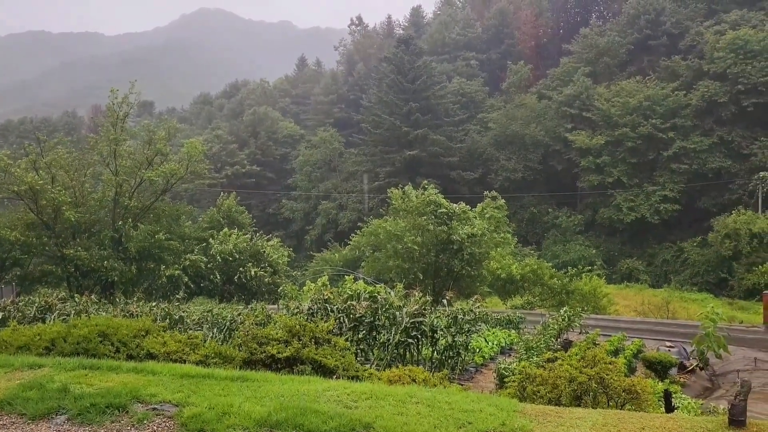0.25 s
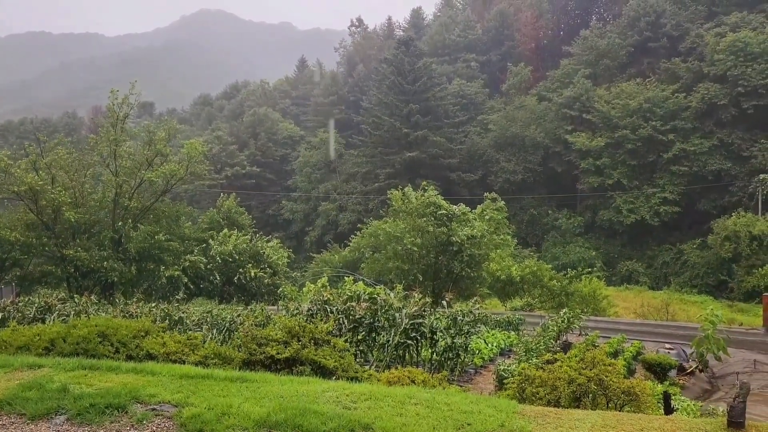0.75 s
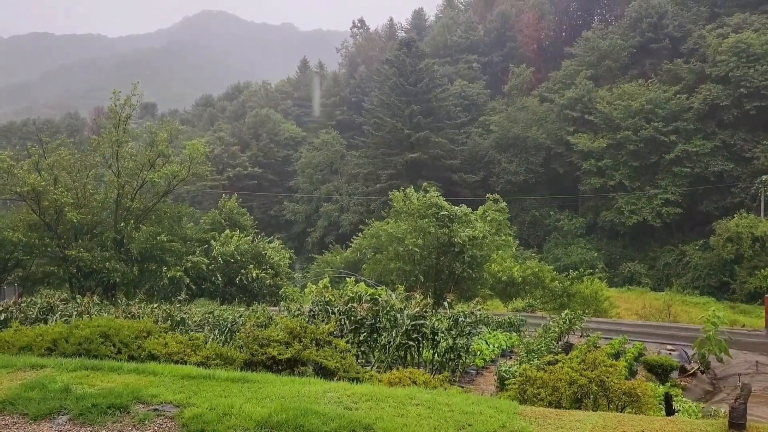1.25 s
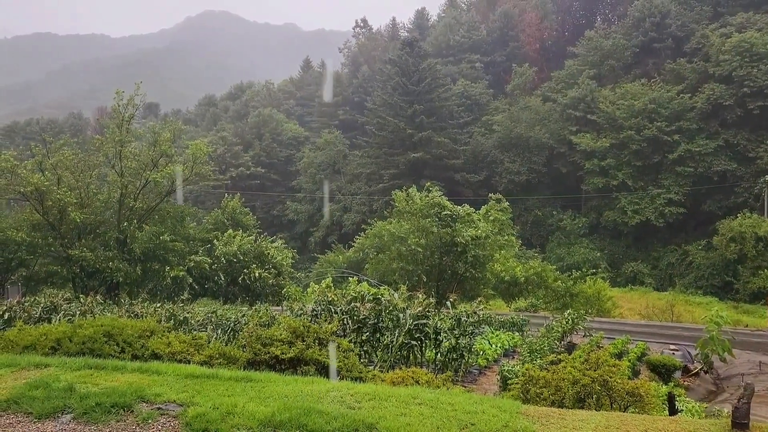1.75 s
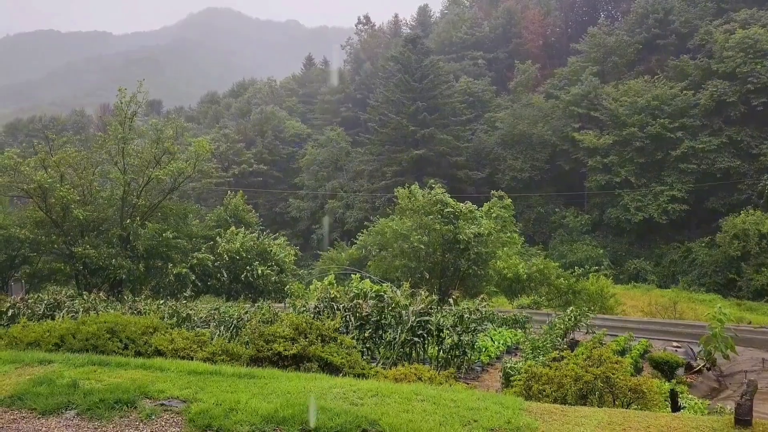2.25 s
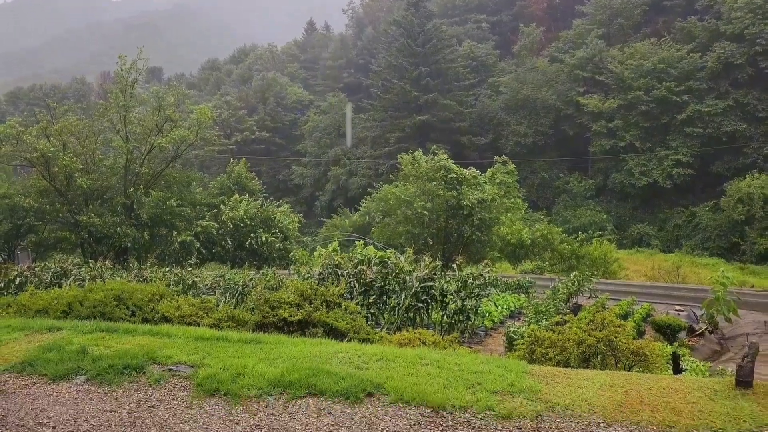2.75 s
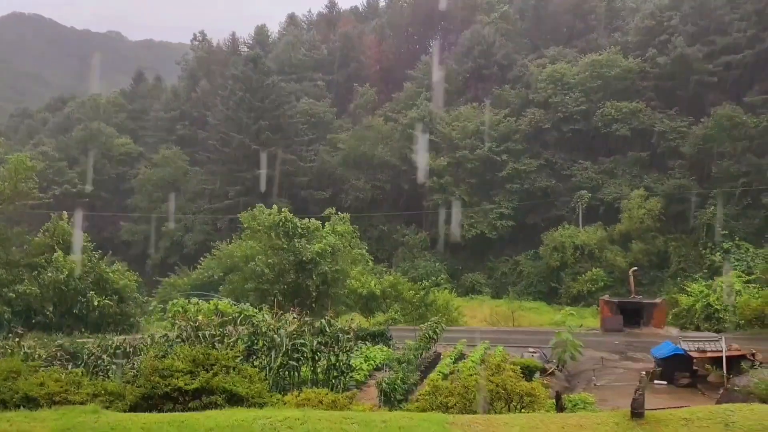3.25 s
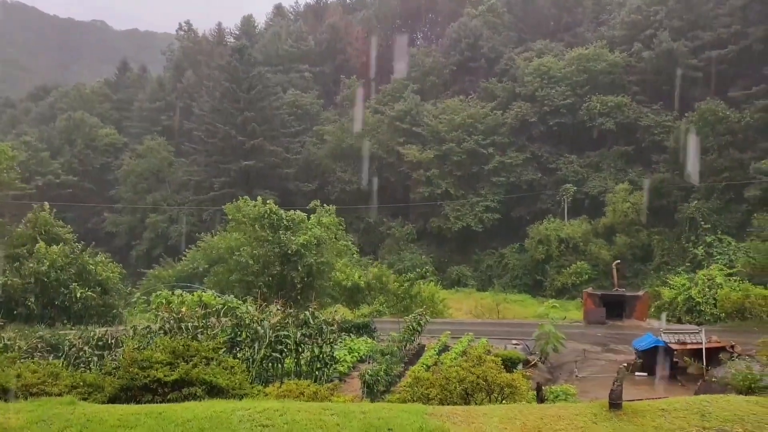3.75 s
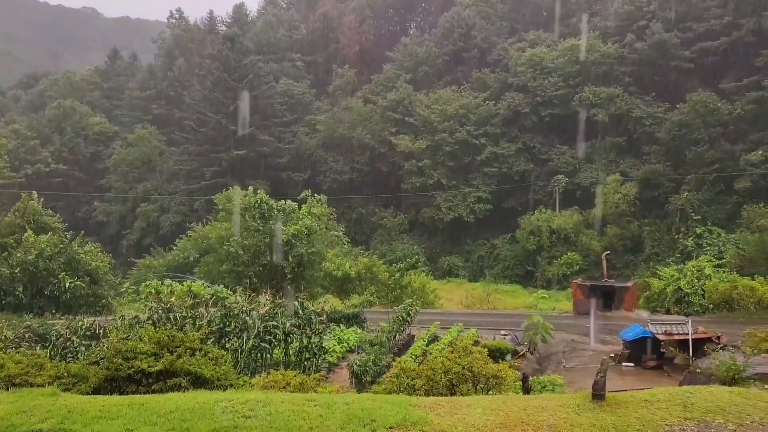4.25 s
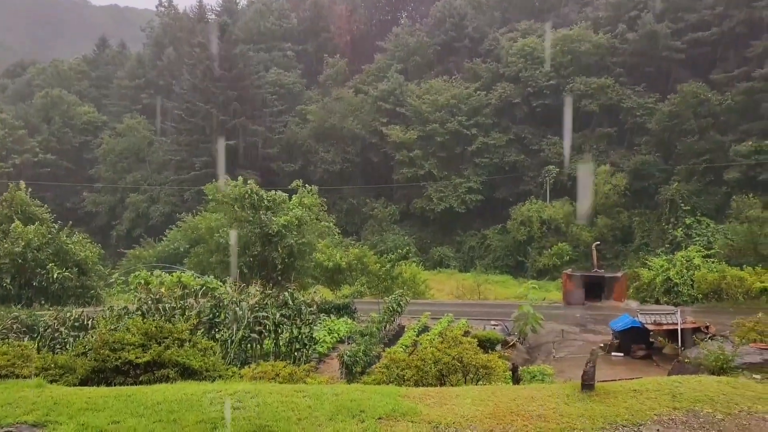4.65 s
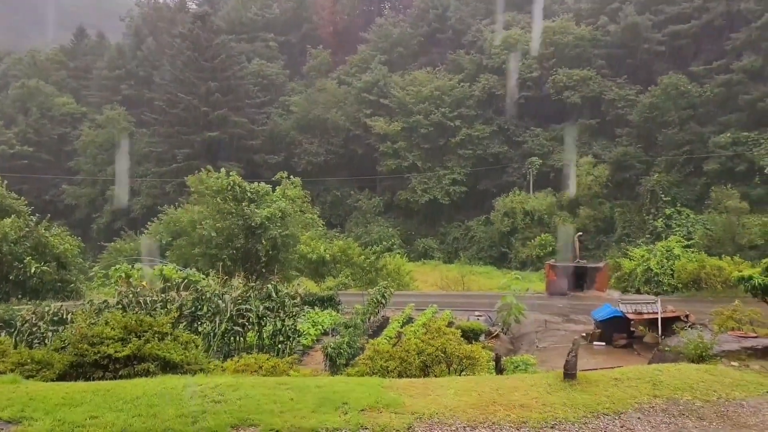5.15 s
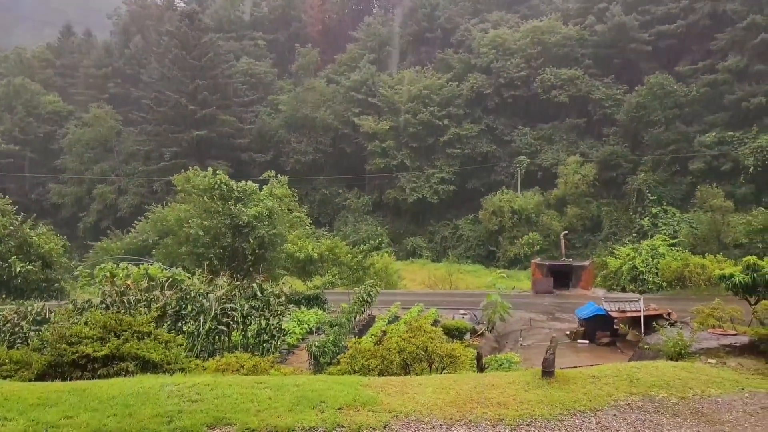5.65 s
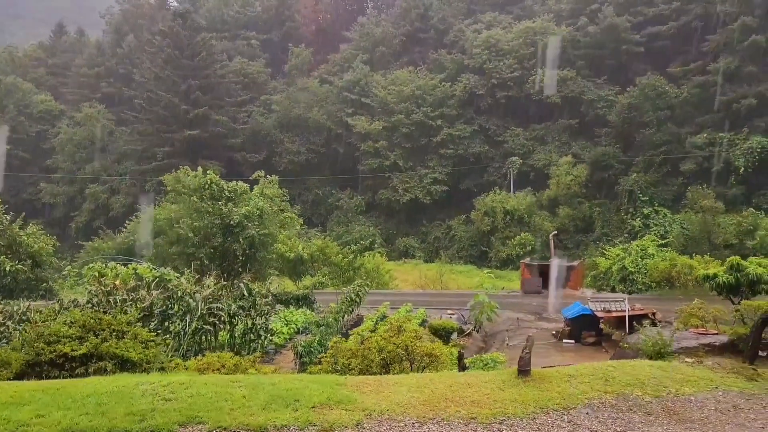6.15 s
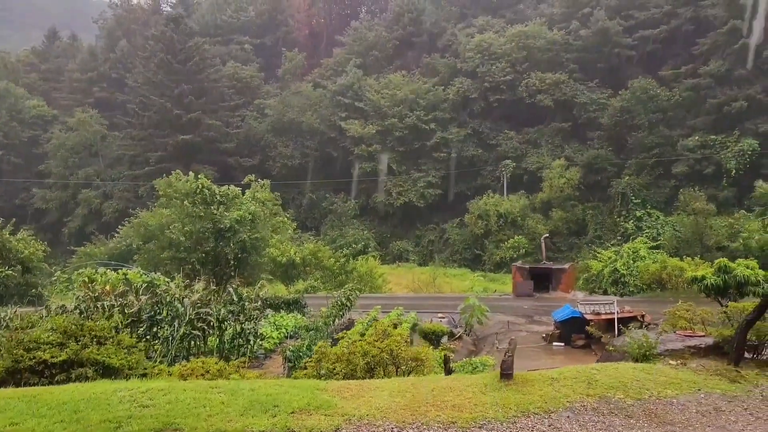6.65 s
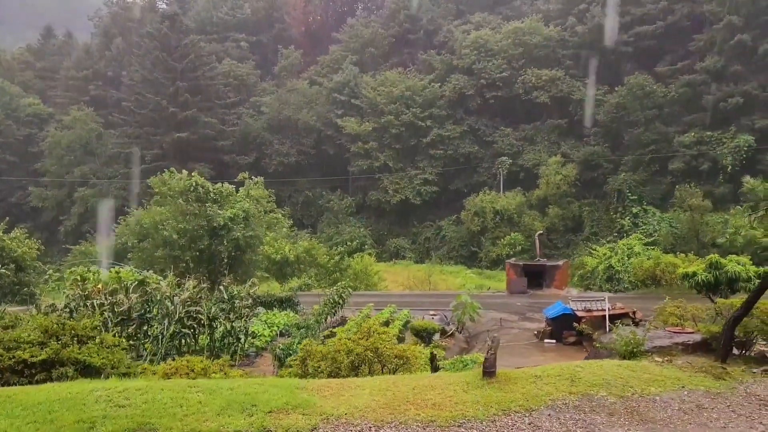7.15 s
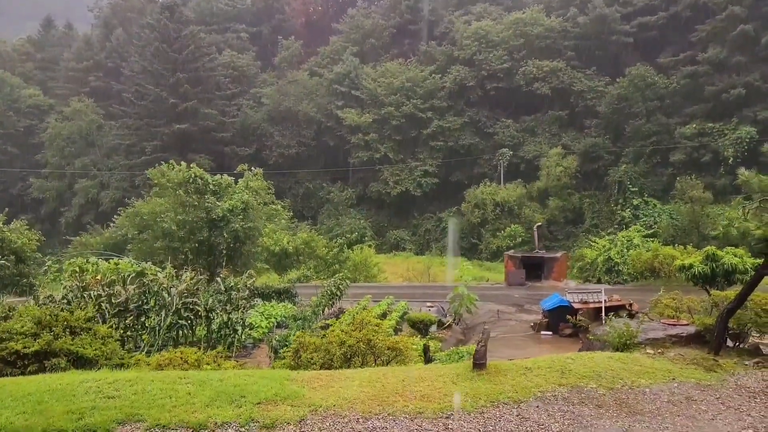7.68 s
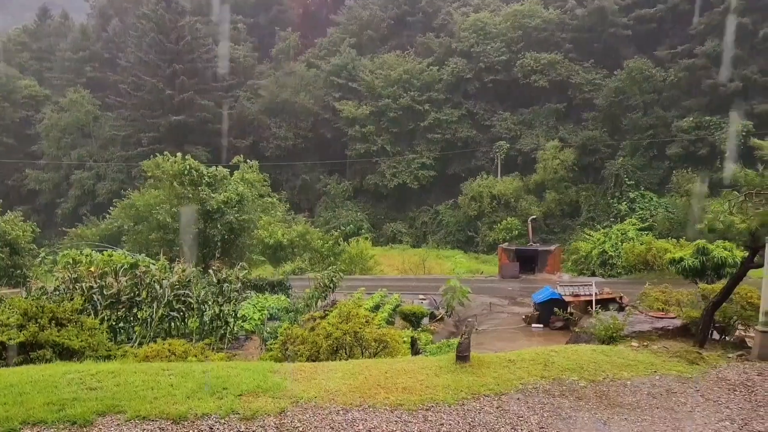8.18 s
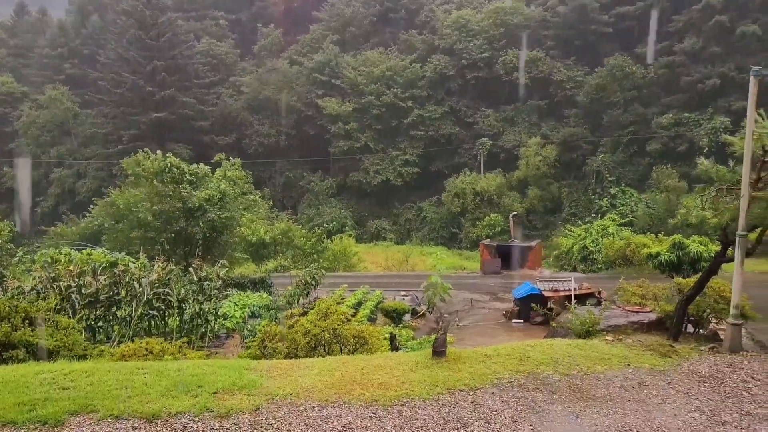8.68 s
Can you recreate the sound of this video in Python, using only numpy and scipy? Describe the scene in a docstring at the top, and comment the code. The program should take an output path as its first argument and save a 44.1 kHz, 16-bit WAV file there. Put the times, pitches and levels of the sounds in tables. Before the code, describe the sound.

Crisp spattering rain and clicking roof drips outside a house, briefly cut out at three seconds, returning as a louder steady downpour.

```python
"""Rain on trees, grass and a gravel yard, heard from under the eaves of a house by two spaced microphones. Near
drops are random clicks of uneven size, each ringing briefly at one of many pitches; eave drips crack, tick,
plop and spray on wet gravel. Far rain is a smooth hiss of noise bands; a low rumble of filtered noise swells at
times. After three seconds the sound drops out for an instant and the scene changes to heavier, fuller rain."""
import sys
import numpy as np
from scipy import signal
from scipy.io import wavfile
from scipy.ndimage import uniform_filter1d

SR = 44100
rng = np.random.default_rng(int(sys.argv[2]) if len(sys.argv) > 2 else 0)


def digitize_waveform(pressure):
    """Quantize a signal to 16-bit integers and store it at the path in sys.argv[1].

    Rows of a 2-D input are taken as channels; values are limited to [-1, 1].
    """
    field = np.atleast_2d(pressure).T
    bounded = np.clip(field, -1, 1)
    quanta = np.round(bounded * 32767).astype(np.int16)
    wavfile.write(sys.argv[1], SR, quanta)


N = 393372

# Pairs of settings: light rain, then heavy rain. Left-right differences: + is left.
DROPOUT_S = (2.9885, 3.0215)   # silent from, to
SPACING_M, SOUND_M_S = 0.17, 343   # microphone spacing, speed of sound


def from_db(db):
    """Gain of a level in dB."""
    return 10 ** (np.asarray(db) / 20)


def rms_one(x):
    """Scaled to rms 1."""
    return x / np.sqrt(np.mean(x ** 2) + 1e-20)


def peak_one(x):
    """Scaled to peak 1."""
    return x / np.abs(x).max()


def at_hz(points, hz):
    """Spectrum read on a log-frequency axis."""
    points_hz, points_db = np.array(points).T
    return np.interp(np.log(hz), np.log(points_hz), points_db)


def drift(rate_hz):
    """Slow random signal of rms 1: noise through a double one-pole low-pass, computed at SR / 40."""
    r = np.exp(-80 * np.pi * rate_hz / SR)
    white = rng.standard_normal(N // 40 + 2002)
    slow = signal.lfilter([1], [1, -2 * r, r * r], white)[2000:]   # run-in dropped
    return np.interp(np.arange(N) / 40, np.arange(len(slow)), rms_one(slow))


def resonance(hz, width_hz):
    """Two-pole band-pass coefficients, gain about 1 at the peak."""
    r = np.exp(-np.pi * width_hz / SR)
    b = (1 - r * r) / 2 * np.array([1, 0, -1])
    a = [1, -2 * r * np.cos(2 * np.pi * hz / SR), r * r]
    return b, a


def heavy():
    """0 in the light rain, 1 in the heavy rain; switches inside the dropout."""
    return (np.arange(N) / SR > np.mean(DROPOUT_S)) * 1.


def by_rain(pair):
    """One value in the light rain, another in the heavy rain."""
    return np.interp(heavy(), [0, 1], pair)


# steady near spatter, light then heavy rain: (time [s], level [dB])
SPATTER_LEVEL = [
    [(0.0, -33), (0.36, -34), (0.68, -30.5), (0.86, -33.5), (1.23, -43), (1.53, -33.5), (2.13, -40),
     (2.98, -37)],
    [(3.03, -29.5), (3.24, -25), (5.34, -24.5), (6.28, -27), (6.62, -24.5), (7.16, -28), (7.41, -25.5),
     (8.92, -28)],
]
# droplet colour: (frequency [Hz], gain [dB])
SPATTER_COLOUR = [(900, -2), (1700, 0.5), (2200, 4.5), (3200, -1), (4500, -1), (7000, -3), (10000, -4),
                  (14000, -1)]
SPATTER_PER_S = (1700, 3000.0)   # base droplet rate, before bunching, splashes and pitch weighting
SPLASH_EXTRA_RATE = 1.5   # rate gain is 1 + this where splashes drown the steady spatter
HIGHER_DENSER_POWER = 0.6   # droplet rate grows with this power of pitch
SPATTER_LEAN = (-.4, .8)   # bias of droplet place before tanh: - right, + left
SPATTER_DULL_DB = (-28, -9)   # gain of steady spatter below 2 kHz, easing to 0 dB at 3.2 kHz
SPATTER_PAN_DB = (0, -0.5)   # added left-right difference


def spatter(size_db, side_db, cycles, patchy_db):
    """Droplets burst at random places; each rings briefly at one of eighteen pitches, whatever its size."""
    time_s, level_db = np.concatenate(SPATTER_LEVEL).T
    steady = from_db(2 * np.interp(np.arange(N) / SR, time_s, level_db))   # power
    dull_db = by_rain(SPATTER_DULL_DB)
    power = steady + splash_power(0)
    per_s = by_rain(SPATTER_PER_S) * (1 + SPLASH_EXTRA_RATE * (1 - steady / power))
    lean = by_rain(SPATTER_LEAN)
    out, pitches_hz = np.zeros((2, N)), np.geomspace(1000, 14500, 18)
    for k, hz in enumerate(pitches_hz):
        if k % 6 == 0:   # low, middle and high droplets bunch separately
            bunches = splashes(per_s=45.0, fade_s=.012, depth=1.5)
        denser = (hz / np.median(pitches_hz)) ** HIGHER_DENSER_POWER
        born = rng.random(N) < per_s * bunches * denser / SR / len(pitches_hz)
        at = np.flatnonzero(born)
        excess = np.minimum(rng.exponential(1, N), 5)[at]
        sizes = from_db(size_db * excess) * rng.choice([-1, 1], N)[at]
        place = np.tanh(2.5 * rng.uniform(-1, 1, N)[at] + lean[at])   # -1 right .. 1 left
        clicks = np.full((2, N + 64), 1e-18)
        for ch, sign in enumerate((1, -1)):
            lag_s = (1 - sign * place) * SPACING_M / 2 / SOUND_M_S
            lag = np.round(lag_s * SR).astype(int)
            clicks[ch, at + lag] = sizes * from_db(sign * side_db * place)
        rung = rms_one(signal.lfilter(*resonance(hz, hz / cycles), clicks[:, :N]))
        dull_share = np.clip((3200 - hz) / 1200, 0, 1)
        steady_here = steady * from_db(2 * dull_share * dull_db)
        power_share = (steady_here + splash_power(splash_colour_db(hz))) / power
        colour_db = at_hz(SPATTER_COLOUR, hz) + patchy_db * drift(7.5)
        out += rung * np.sqrt(hz * power_share) * from_db(colour_db)
    running_power = uniform_filter1d(np.mean(out ** 2, axis=0), size=SR // 2)
    evened = out / np.sqrt(running_power)
    return evened * np.sqrt(power) * from_db(by_rain(SPATTER_PAN_DB) * [[.5], [-.5]])


def splashes(per_s, fade_s, depth):
    """Small splashes start at once and fade: a factor on the droplet rate, mean 1."""
    starts = (rng.random(N) < per_s / SR) * rng.exponential(1, N)
    fading = signal.lfilter([1], [1, -np.exp(-1 / (fade_s * SR))], starts + 1e-18)
    return (1 + depth * fading) / (1 + depth * fading.mean())


SPLASH_RISE_S, SPLASH_FADE_S = 0.002, 0.02   # time constants of power


def splash_power(weights_db):
    """Spatter power added by the loud drips: each rises fast and dies away, weighted."""
    time_s, _, _, _, splash_db, _ = np.transpose(DRIPS)
    starts = np.full(N, 1e-18)
    starts[(time_s * SR).astype(int)] = from_db(2 * (splash_db + weights_db))
    rise, fade = np.exp(-1 / (np.array([SPLASH_RISE_S, SPLASH_FADE_S]) * SR))
    return signal.lfilter([1 - rise], np.convolve([1, -rise], [1, -fade]), starts)


SPLASH_OCTAVES, SPLASH_WIDE_DB = 0.77, -21.5   # distance from drip pitch for -6 dB; floor far from it


def splash_colour_db(hz):
    """Weight of each splash at one pitch, greatest at the pitch of its drip."""
    octaves = np.log2(hz / np.transpose(DRIPS)[2])
    return np.maximum(-6 * (octaves / SPLASH_OCTAVES) ** 2, SPLASH_WIDE_DB)


# loudest drips: (time [s], crack peak [dB], centre [Hz], plop re crack [dB], splash [dB], left-right [dB])
DRIPS = [(0.0528, -15, 7100, -26, -31, 5), (0.222, -24, 7100, -26, -26, -1),
         (0.2356, -7, 7100, -28, -24.5, 3.5), (0.2581, -10.5, 3600, -27, -29, 1.5),
         (0.288, -17, 5040, -24, -34, -1), (0.4675, -13, 7960, -29, -29, 6),
         (0.5094, -18, 2540, -15, -34, -0.5), (0.5542, -11, 4010, -23, -29.5, 4),
         (0.5915, -12, 6330, -27, -27, 3.5), (0.5969, -12, 7100, -25, -30, 3.5),
         (0.6814, -18, 4490, -37, -35, 4), (0.7126, -15, 7960, -26, -30, 2),
         (0.7302, -12, 7960, -24, -36, -0.5), (0.7489, -10, 8920, -26, -27, -2),
         (0.7569, -13, 5650, -29, -31, 2.5), (0.8321, -16, 6330, -25, -39, -0.5),
         (0.8581, -16, 6330, -23, -28, 3), (0.8812, -13, 10000, -27, -27, -1),
         (0.943, -13, 5570, -24, -28, 2), (0.9818, -8, 3980, -20, -24.5, -2),
         (1.0615, -14.5, 4010, -24, -34, 4), (1.0798, -13, 6330, -28, -27, 1),
         (1.155, -10, 7850, -30, -31, 4), (1.2807, -11.5, 3600, -28, -30, 2.5),
         (1.3435, -13, 5040, -28, -39, 1), (1.4207, -10, 6330, -24, -25, -4),
         (1.4484, -10, 3620, -21, -24.5, -2.5), (1.4583, -10, 7100, -20, -24, 0.5),
         (1.4725, -12, 7100, -26, -29, 3), (1.5737, -15, 7100, -32, -27, 1.5),
         (1.581, -14, 7100, -26, -34, 6), (1.6444, -17, 5650, -23, -35, -3.5),
         (1.7783, -12, 10000, -29, -29.5, 1), (1.7892, -17, 6330, -24, -33, 10),
         (1.9126, -20, 7100, -23, -33, 4), (2.0009, -22, 7100, -18, -32, 5),
         (2.0218, -17, 6330, -27, -34, 1.5), (2.0716, -20, 5650, -22, -37, -2),
         (2.137, -18, 2540, -13, -36, 0), (2.1578, -23, 5650, -13, -36, 2),
         (2.2149, -22, 10000, -19, -30, 3), (2.2258, -15, 7100, -31, -28, 1),
         (2.245, -12.5, 6330, -25, -32, 3.5), (2.3231, -16, 4010, -20, -38, -3),
         (2.3786, -12, 6330, -23, -28, 0.5), (2.4326, -19, 3570, -20, -35, 0),
         (2.5643, -1.5, 7800, -30, -20.5, 1), (2.5738, -7, 7960, -31, -27, 6),
         (2.601, -16.5, 2550, -17, -30, -2.5), (2.657, -16, 7100, -21, -25, 2.5),
         (2.692, -13, 5650, -24, -32, -2.5), (2.742, -14, 4490, -19, -24.5, -3),
         (2.7552, -5.5, 8000, -33, -24.5, 2.5), (2.8277, -17, 6339, -25, -35, 0),
         (2.8916, -16, 7100, -23, -32, 1.5), (2.9702, -16, 7100, -26, -32, 0),
         (3.1013, -14, 6330, -25, -27, -1), (3.1931, -12, 8920, -23, -24, 2),
         (3.2458, -10, 7100, -23, -24, 2), (3.3757, -12, 10000, -21, -30, -1),
         (3.4422, -13, 7100, -17, -31, 2), (3.589, -8, 6330, -24, -21.5, -1),
         (3.599, -6, 5650, -25, -24, -2), (3.7085, -11, 2260, -10, -26, -2),
         (3.8561, -12, 7100, -25, -32, 3), (3.8954, -13, 3570, -12, -31, -2),
         (3.952, -5.5, 7960, -20, -22.5, 5), (3.9886, -4, 4000, -19, -20.5, 0.5),
         (4.0621, -11, 10000, -20, -29, 3), (4.1563, -9, 6330, -26, -27, 3),
         (4.1831, -11, 2020, -11, -23.5, 3), (4.2042, -9, 7100, -21, -17.5, 5),
         (4.3705, -11, 3570, -25, -27, 2), (4.4164, -6, 7100, -18, -24, -1.5),
         (4.661, -14, 1800, -9, -27, 7), (4.7398, -13, 7100, -15, -28, 4), (4.7672, -15, 1800, -10, -33, 0),
         (4.7942, -10, 7960, -23, -25, -3), (4.8361, -11, 4490, -23, -30, -1),
         (4.984, -15, 2840, -14, -32, 2), (5.0545, -6.5, 4490, -21, -23, 1.5),
         (5.0943, -9, 5650, -27, -24.5, 1), (5.1442, -12, 2260, -14, -25.5, 0),
         (5.2114, -8, 7100, -21, -24, -0.5), (5.31, -7, 5040, -24, -28, 0), (5.414, -14, 4490, -23, -23, 3),
         (5.4304, -6, 5040, -28, -22, 1), (5.5477, -8, 3570, -42, -29, 0.5),
         (5.5647, -7, 4010, -20, -33, 0), (5.7482, -9, 6330, -26, -29, -3.5),
         (5.849, -10.5, 2840, -15, -24.5, 0.5), (5.9709, -14, 2020, -13, -26, -2),
         (6.0901, -13, 3570, -24, -31, 2), (6.1962, -16, 2540, -14, -39, 2),
         (6.2653, -14, 2020, -11, -34, 1), (6.3172, -16, 1820, -15, -32, 0.5),
         (6.3894, -11, 3570, -20, -23, 2), (6.4569, -9, 7960, -25, -28.5, -1),
         (6.5767, -9.5, 5040, -23, -30, -1.5), (6.6348, -9, 10000, -16, -31, -2),
         (6.7123, -9, 1810, -14, -24, 1), (6.8242, -18, 4490, -21, -32, -2.5),
         (6.8974, -8, 2540, -16, -25, 0), (6.9589, -9, 10000, -22, -26, -1.5),
         (7.0351, -16, 2540, -13, -26, 0.5), (7.0724, -8, 7100, -10, -26, 4),
         (7.2154, -15, 2540, -18, -26, 2.5), (7.2339, -13.5, 1800, -15, -29, 1.5),
         (7.3441, -9.5, 3190, -9, -26.5, 1.5), (7.3692, -7.5, 4010, -15, -28, -0.5),
         (7.4422, -15, 10000, -19, -32, 0), (7.5218, -5, 4490, -12, -22, 0),
         (7.5306, -12, 2540, -12, -24, 2), (7.5436, -7, 10000, -14, -26, 1),
         (7.5937, -14, 2020, -9, -33, 1), (7.6645, -16, 2020, -11, -32, 0),
         (7.713, -10, 3570, -18, -34, -2), (7.8076, -7, 4010, -17, -24, -1),
         (7.8176, -12, 7100, -10.5, -25, 1.5), (7.8359, -11, 7100, -11, -30, 1),
         (7.9275, -8.5, 4010, -18, -36, 0), (7.9828, -12, 5650, -17, -23.5, -1),
         (7.9918, -10, 5650, -23, -29, -0.5), (8.0796, -14, 2540, -16, -31, -0.5),
         (8.1453, -13, 5040, -19, -26, 3), (8.1655, -3, 7960, -31, -25, -4),
         (8.2107, -12, 7960, -31, -31, 2), (8.258, -14, 1800, -11, -34, 2),
         (8.2799, -12, 1800, -11, -31, 2), (8.3371, -8, 7100, -25, -26, 3), (8.437, -8, 4010, -17, -31, -2),
         (8.5267, -16, 2260, -6, -27, 1), (8.578, -13, 2540, -15, -30, 1.5),
         (8.6633, -10, 7960, -19, -25, 3.5), (8.6966, -6.5, 4010, -15, -25.5, -1),
         (8.7801, -10, 7960, -20, -27.5, -3), (8.8196, -17, 2020, -10, -34, -1),
         (8.8754, -12, 7100, -27, -28, 4)]
PITCH_REF_HZ, PITCH_TOP_HZ = 2600, 8000   # pitch range of lesser drips; tick and plop levels refer to the lowest
TICK_DB, TICK_PER_OCTAVE_DB = -17, -11   # re crack; higher drips tick more softly
FULL_SIDE_DB = 6   # left-right difference that scales the arrival lag, inside a tanh


def drips(crack_s, wide, spray_s, spray_db, sharp, grit, tick_hz, plop_hz, plop_width_hz):
    """Each drip lands with a wide crack, a bright tick and a dull plop, then leaves a gritty dying spray."""
    out, t = np.zeros((2, N + 2600)), np.arange(2500) / SR
    loud = np.delete(DRIPS, 4, axis=1)   # splash column belongs to the spatter
    rows = np.concatenate([loud, small_drips(count=110)])
    noise = rng.standard_normal((len(rows), 4, len(t)))
    chance = rng.uniform(-1, 1, (len(rows), 3))
    bright = signal.butter(2, tick_hz, "high", fs=SR)
    fall = t / crack_s * np.exp(-t / crack_s)
    for row, (both, high, *own), (aside, size, edge) in zip(rows, noise, chance):
        time_s, peak_db, hz, plop_db, pan_db = row
        tick_db = TICK_DB + TICK_PER_OCTAVE_DB * np.log2(hz / PITCH_REF_HZ) + 4 * edge
        place = -np.tanh(pan_db / FULL_SIDE_DB + 1.3 * aside)   # negative: left hears it first
        crack = peak_one(signal.lfilter(*resonance(hz, hz / wide), both * fall))
        tick = peak_one(signal.lfilter(*bright, high * fall))
        cavity = resonance(plop_hz * 1.2 ** size, plop_width_hz)   # applied twice for steep skirts
        once = signal.lfilter(*cavity, np.diff(fall, prepend=0))
        plop = peak_one(signal.lfilter(*cavity, once))
        droplets = np.sign(own) * np.abs(own) ** grit   # power above 1 turns smooth noise into grains
        spray = rms_one(signal.lfilter(*resonance(hz, hz / sharp), droplets)) * np.exp(-t / spray_s)
        blow = crack + from_db(tick_db) * tick + from_db(plop_db) * plop
        for ch, sign in enumerate((1, -1)):
            at = round((time_s + sign * place * SPACING_M / 2 / SOUND_M_S) * SR)
            gain = from_db(peak_db + sign * pan_db / 2)
            out[ch, at:at + len(t)] += gain * (blow + from_db(spray_db) * spray[ch])
    return out[:, :N]


SMALL_DRIPS_DB, SMALL_DRIPS_PAN_DB = (-23.5, -13), (3.5, 4)   # mean crack peak, mean left-right difference
PLOP_DB, PLOP_PER_OCTAVE_DB = -10.5, -9   # mean re crack; higher drips plop less


def small_drips(count):
    """Lesser drips at random moments, as rows like those of the loud ones, without a splash."""
    when, size, pitch, plop, place = rng.random((count, 5)).T
    time_s = when * (N - 1) / SR
    at = (time_s * SR).astype(int)
    hz = PITCH_REF_HZ * (PITCH_TOP_HZ / PITCH_REF_HZ) ** pitch
    peak_db = by_rain(SMALL_DRIPS_DB)[at] + 6 * (size - .5)
    plop_db = PLOP_DB + PLOP_PER_OCTAVE_DB * np.log2(hz / PITCH_REF_HZ) + 6 * (plop - .5)
    pan_db = by_rain(SMALL_DRIPS_PAN_DB)[at] + 9 * (place - .5)
    return np.transpose([time_s + 0.001016, peak_db, hz, plop_db, pan_db])   # offset keeps starts above 0


FAR_LIGHT_DB, FAR_HEAVY_DB = -33.5, -24.5   # rms
# far rain spectrum, light: (frequency [Hz], relative density [dB per Hz])
FAR_LIGHT = [(53, -40), (90, -11), (1790, -6), (2230, -7.5), (6030, -5), (7170, -3.5), (8910, -10),
             (12900, -4), (15000, -14.5), (16000, -22)]
# far rain spectrum, heavy: (frequency [Hz], relative density [dB per Hz])
FAR_HEAVY = [(53, -36), (90, -8.5), (214, -13), (532, -10.5), (998, -11.5), (2270, -5.5), (7490, -1.5),
             (9720, -1.5), (14700, -8.5), (16000, -18)]


def far_rain(patchy_db, shared):
    """Third-octave noise from all around; likeness of the channels follows the microphone spacing."""
    out, late, edges_hz = 0, heavy(), 80 * 2 ** (np.arange(24) / 3)
    white = rng.standard_normal((2, 2, N))
    for k, (low, high) in enumerate(zip(edges_hz, edges_hz[1:])):
        band = signal.butter(2, [low, high], "band", fs=SR, output="sos")
        mid, side = signal.sosfilt(band, white[k % 2])   # neighbours use separate noise
        hz = np.sqrt(low * high)
        alike = min(shared, 1) * np.sinc(2 * hz * SPACING_M / SOUND_M_S)
        colour_db = np.where(late, at_hz(FAR_HEAVY, hz), at_hz(FAR_LIGHT, hz))
        gain = from_db(colour_db + patchy_db * drift(8.6))
        out = out + gain * (np.sqrt(1 + alike) * mid + np.sqrt(1 - alike) * side * [[1], [-1]])
    light_gain = from_db(FAR_LIGHT_DB) / out[:, late == 0].std()
    heavy_gain = from_db(FAR_HEAVY_DB) / out[:, late == 1].std()
    return out * np.where(late, heavy_gain, light_gain)


def rumble(side_db, floor_db):
    """Low noise that swells and sinks over a steady deeper floor, nearly alike in both channels."""
    white = rng.standard_normal((2, 2, N))
    swell_band = signal.butter(3, [50, 84], "band", fs=SR, output="sos")
    floor_band = signal.butter(2, [22, 60], "band", fs=SR, output="sos")
    swell = rms_one(signal.sosfilt(swell_band, white[0]))
    floor = rms_one(signal.sosfilt(floor_band, white[1]))
    mid, side = rumble_gain() * swell + from_db(floor_db) * floor
    return mid + from_db(side_db) * side * [[1], [-1]]


# rumble swells, timed between ramp midpoints: (start [s], length [s], level if fully risen [dB])
SWELLS = [(0.39, 0.084, -39.5), (3.061, 0.11, -48), (3.278, 0.26, -45), (4.583, 0.06, -53),
          (6.254, 0.094, -48), (6.785, 0.13, -54), (7.042, 0.028, -49), (8.824, 0.04, -43)]
RUMBLE_DB, RUMBLE_WAVER_DB = (-65, -53.5), 0.5   # bed level; rms waver
SWELL_RISE_S, SWELL_FALL_S, SWELL_FLUTTER_DB = 0.063, .02, 2   # ramp lengths; rms flutter


def rumble_gain():
    """Wavering bed plus a few stronger swells that grow slowly and stop short."""
    t = np.arange(N) / SR
    gain = from_db(by_rain(RUMBLE_DB) + RUMBLE_WAVER_DB * drift(3.5))
    flutter_db = SWELL_FLUTTER_DB * drift(9.8)
    for start_s, length_s, level_db in SWELLS:
        rise = (t - start_s) / SWELL_RISE_S
        fall = (start_s + length_s - t) / SWELL_FALL_S
        shape = np.clip(np.minimum(rise, fall) + .5, 0, 1) ** 2
        gain = gain + from_db(level_db + flutter_db) * shape
    return gain


def scene():
    """Near spatter and drips over far rain and rumble; the background leans slightly left."""
    near = spatter(size_db=2.0, side_db=4.0, cycles=2.09, patchy_db=1.5)
    near += drips(crack_s=0.00026, wide=3.4, spray_s=0.016, spray_db=-17.0, sharp=6.1, grit=2.3,
                  tick_hz=9000, plop_hz=1830, plop_width_hz=930)
    background = far_rain(patchy_db=1.47, shared=0.98) + rumble(side_db=-13, floor_db=-57.5)
    return background * from_db([[.7], [-.7]]) + near


# microphone colour, light then heavy rain, each left then right: (centre [Hz], width [Hz], gain [dB])
MICROPHONE_COLOUR = [
    [[(7280, 640, 8), (8570, 2460, -12), (10300, 610, -3), (12700, 980, 3.5)], [(5030, 780, -1),
     (6800, 1500, -1), (11200, 12000, -8)]],
    [[(3260, 530, 1.5), (7500, 280, 4.5), (9800, 4400, -7), (13100, 1100, -8)], [(4400, 760, 1),
     (7640, 270, -2.5), (10000, 5200, -5.5), (12300, 740, 2.5)]],
]
CUTOFF_HZ = 16300   # 70 dB down from here


def record(dry):
    """Each microphone colours its channel; the sound drops out, peaks soften by tanh, the top is cut."""
    out, cut = dry.copy(), round(np.mean(DROPOUT_S) * SR)
    for part, channels in zip((slice(0, cut), slice(cut, N)), MICROPHONE_COLOUR):
        for ch, modes in enumerate(channels):
            for hz, width_hz, gain_db in modes:
                ringing = signal.lfilter(*resonance(hz, width_hz), out[ch, part])
                out[ch, part] += (from_db(gain_db) - 1) * ringing
    t = np.arange(N) / SR
    outside_s = np.maximum(DROPOUT_S[0] - t, t - DROPOUT_S[1])
    out *= np.clip(outside_s / .003, 0, 1)   # 3 ms fades
    low_pass = signal.cheby2(14, 70, CUTOFF_HZ, fs=SR, output="sos")
    return signal.sosfilt(low_pass, np.tanh(out))


dry = scene()
out = record(dry)
digitize_waveform(out)
```